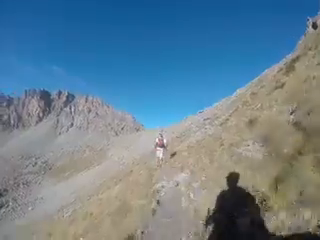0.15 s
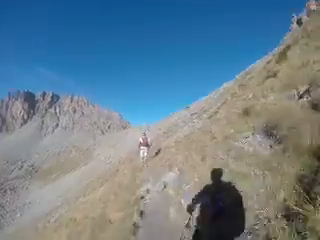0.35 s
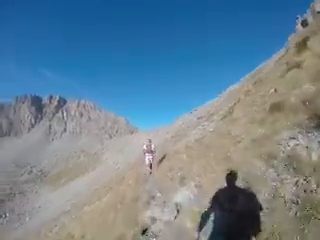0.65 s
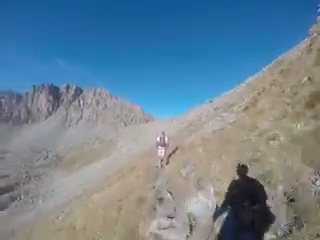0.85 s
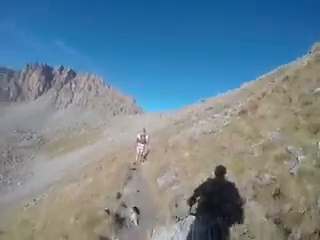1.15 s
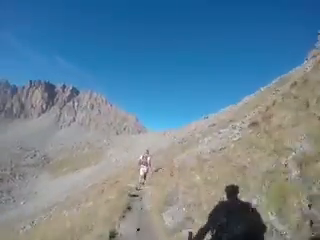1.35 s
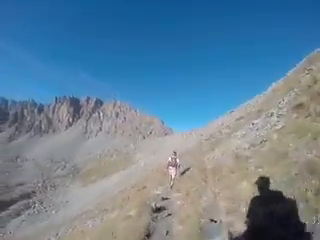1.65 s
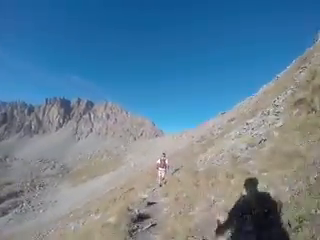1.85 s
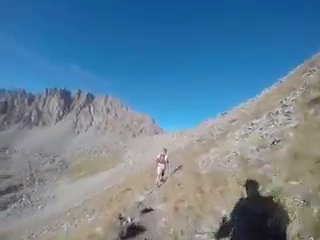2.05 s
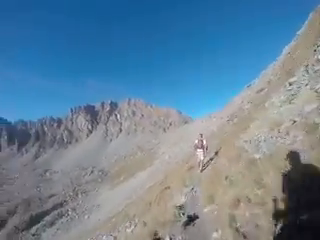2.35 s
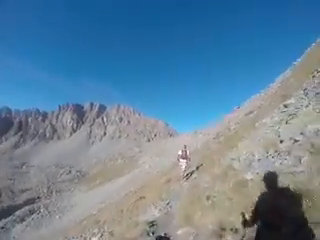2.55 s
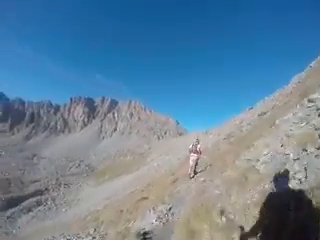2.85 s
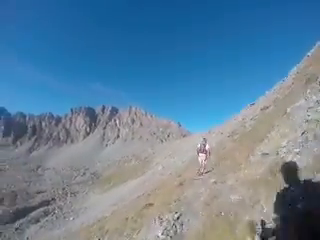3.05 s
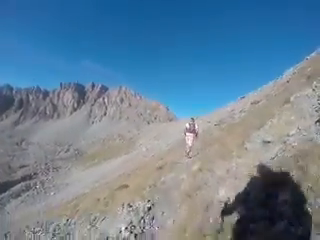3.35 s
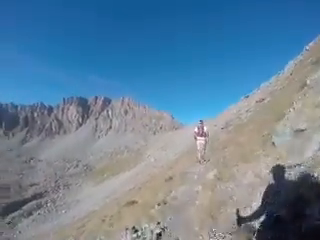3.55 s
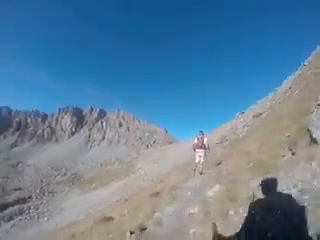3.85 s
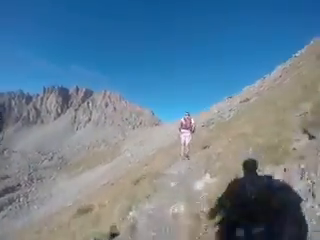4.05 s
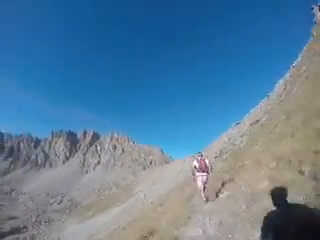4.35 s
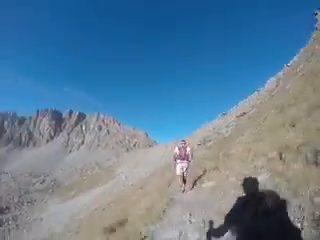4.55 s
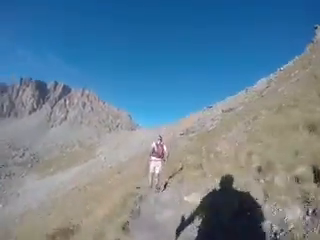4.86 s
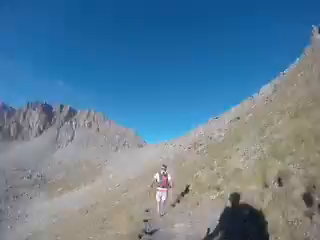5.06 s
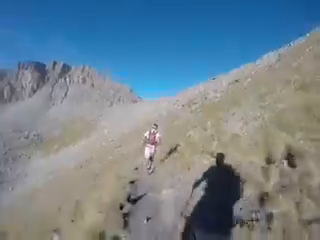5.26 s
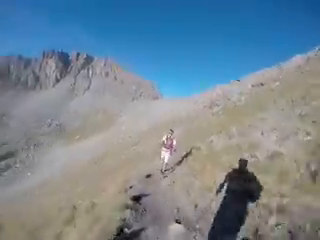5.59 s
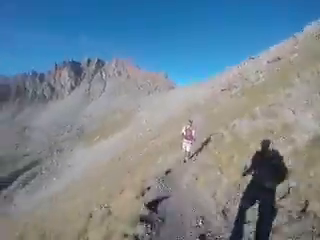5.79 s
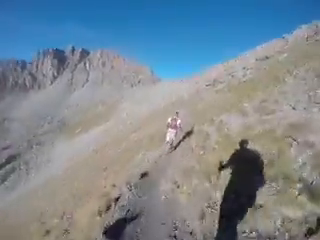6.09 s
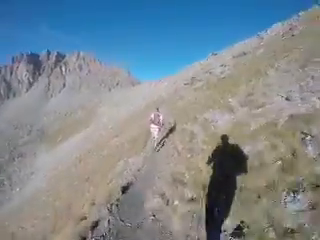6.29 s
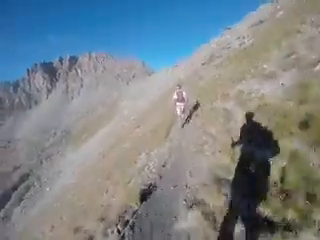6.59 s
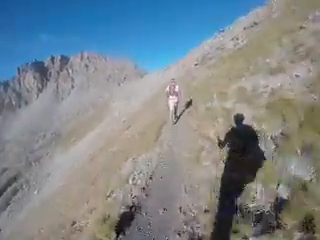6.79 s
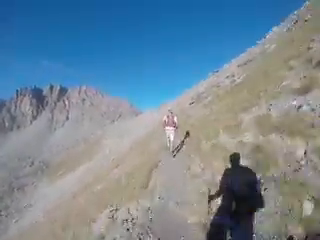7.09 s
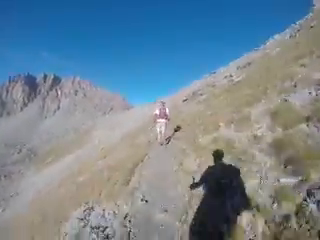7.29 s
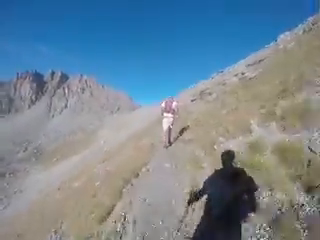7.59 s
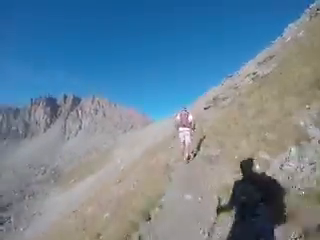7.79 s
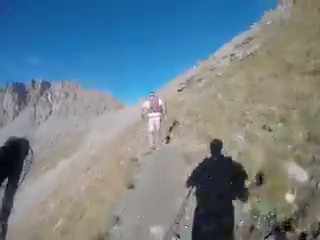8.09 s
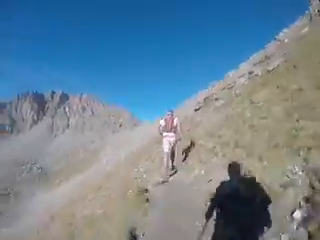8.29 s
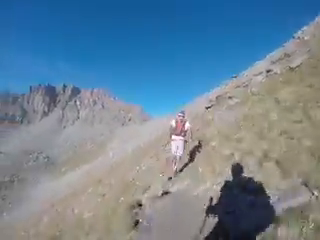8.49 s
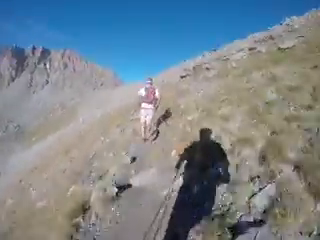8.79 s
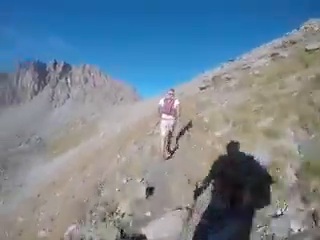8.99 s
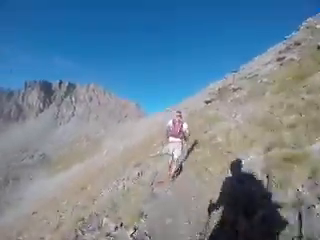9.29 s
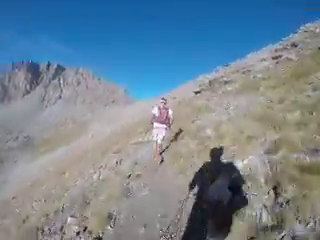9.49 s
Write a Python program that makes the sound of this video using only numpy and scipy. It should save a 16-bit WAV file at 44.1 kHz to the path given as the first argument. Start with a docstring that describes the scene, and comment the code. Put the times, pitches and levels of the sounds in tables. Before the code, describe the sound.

Brisk footsteps crunch on a gravel path with pole clicks, low wind buffets and one sharp knock on the microphone's case.

```python
"""A gravel path on an open slope, heard close from a small cased camera worn on a hiker's body.
Each footfall grinds pebbles and rock chips together and pushes air over the microphone; soles
scuff, pole tips and kicked stones click. Right at the microphone, cloth rustles and the harness
tugs and squeaks. Something knocks the case three times; the hardest blow overloads the input,
and the camera's gain ducks and creeps back."""
import sys
import numpy as np
from scipy import signal
from scipy.fft import rfft, irfft, next_fast_len
from scipy.io import wavfile
from scipy.ndimage import uniform_filter1d, minimum_filter1d, map_coordinates

SR = 44100
rng = np.random.default_rng(int(sys.argv[2]) if len(sys.argv) > 2 else 0)


def generate_wav(signal):
    """Clip the signal to [-1, 1] and save it as 16-bit WAV at the path in sys.argv[1]."""
    frames = np.transpose(np.atleast_2d(signal))
    scaled = np.clip(frames, -1, 1) * 32767
    pcm = np.round(scaled).astype(np.int16)
    wavfile.write(sys.argv[1], SR, pcm)


N = 425124

# Footfalls, close to three a second. Each row: time in seconds, crunch level in dB,
# seconds to fade by 10 dB, level of the air push on the microphone in dB.
FOOTFALLS = [(0.05, -57, .04, -47), (0.38, -55.5, .1, -48), (0.73, -52.5, .1, -49),
             (1.093, -53.5, .04, -46.5), (1.45, -58.5, .12, -46.5), (1.85, -56, .07, -44),
             (2.21, -54.5, .17, -43.5), (2.58, -57.5, .2, -46), (3.0, -54.5, .1, -48),
             (3.325, -54, .08, -42), (3.675, -55, .08, -48), (4.01, -51.5, .11, -42), (4.31, -52, .17, -45),
             (4.66, -54, .11, -47), (5.02, -55.5, .17, -50), (5.37, -55, .09, -44), (5.745, -56, .14, -49),
             (6.13, -53.5, .11, -45), (6.535, -51, .16, -45), (6.835, -51.5, .1, -44),
             (7.12, -54, .14, -44), (7.41, -53, .12, -41), (7.735, -52, .12, -46), (8.04, -51.5, .2, -38.5),
             (8.4, -51.5, .11, -42.5), (8.73, -54.5, .08, -44), (9.122, -54.5, .08, -49),
             (9.51, -56, .1, -48)]


def amp(db):
    """Decibels to gain."""
    return 10 ** (np.asarray(db) / 20)


def unit(x):
    """Scaled to rms 1."""
    return x / np.sqrt(np.mean(x ** 2) + 1e-20)


def wobble(rate):
    """A smooth random curve, rate knots a second."""
    knots = rng.standard_normal(int(N * rate / SR) + 4)
    return map_coordinates(knots, [np.arange(N) * rate / SR])


def filtered(x, response):
    """x through a complex response of frequency."""
    m = next_fast_len(len(x) + 8192)
    return irfft(rfft(x, m) * response(np.fft.rfftfreq(m, 1 / SR)), m)[:len(x)]


def colour(points):
    """Causal response with the gains of (Hz, dB) points."""
    def response(hz):
        f, db = np.transpose(points)
        gain = amp(np.interp(np.log(hz + 1), np.log(f), db))
        cepstrum = irfft(np.log(gain))
        half = len(cepstrum) // 2
        return np.exp(rfft(np.r_[cepstrum[0], 2 * cepstrum[1:half]], len(cepstrum)))
    return response


def resonance(hz, centre, width):
    """One damped mode, gain 1 at its centre."""
    return 1j * hz * width / (centre ** 2 - hz ** 2 + 1j * hz * width)


def noise(points):
    """Coloured noise of rms 1."""
    return unit(filtered(rng.standard_normal(N), colour(points)))


def add(track, s, sound):
    """Mix a sound into the track from s seconds on."""
    part = track[max(round(s * SR), 0):][:len(sound)]
    part += sound[:len(part)]


def swell(s, rise_s, fade_s, hold_s=.018):
    """Gain of one footfall or scuff: up 10 dB per rise_s, full at s, held, down 10 dB per fade_s."""
    t = np.arange(N) / SR - s
    return amp(-10 * (np.maximum(-t, 0) / rise_s + np.maximum(t - hold_s, 0) / fade_s))


def hiss_and_whine(hiss_db=-57.0, flutter_db=1.2):
    """Steady hiss of open air and microphone, with the camera's faint, fluttering electronic whine."""
    # Colour of the hiss. Each row: frequency in Hz, relative level in dB.
    hiss_colour = [(25, 15.5), (100, 5.5), (250, -1), (600, -2), (1200, -6), (1600, -8), (2100, -10),
                   (2600, -3.5), (3000, -14), (3400, -10), (4000, -13), (5600, -14.5), (7500, -20.5),
                   (11000, -23.5), (15000, -31.5)]
    # Tones of the whine. Each row: frequency in Hz, level in dB.
    tones = [(7101, -90.5), (9469, -82), (11838, -83), (14207, -89.5)]
    t = np.arange(N) / SR
    whine = sum(np.sqrt(2) * amp(db - 0.5 + flutter_db * wobble(25)) * np.sin(2 * np.pi * hz * t)
                for hz, db in tones)
    return amp(hiss_db) * noise(hiss_colour) + whine


def airflow(breeze_db=-58, lead_s=.014, rise_s=.09, fade_s=.1):
    """Strength of the air at the microphone: a light breeze, and a lurch just ahead of each crunch."""
    lurches = sum((amp(db) * swell(s - lead_s, rise_s, fade_s)) ** 2 for s, _, _, db in FOOTFALLS)
    return np.sqrt(lurches + amp(breeze_db) ** 2)


def wind_and_clothes(buffet_db=-1.3, rustle_db=-66.8, flutter_db=5.0):
    """Moving air buffets the microphone in low lumps; cloth rubs harder when the body sways more."""
    # Colours of the buffeting and of the cloth. Each row: frequency in Hz, relative level in dB.
    buffet_colour = [(10, -3.5), (22, 4), (45, -4.5), (80, -10.5), (130, -21.5), (300, -40.5), (900, -77.5)]
    cloth_colour = [(40, -19.5), (90, -2), (150, 0.5), (280, -5), (600, -12.5), (1000, -18), (2500, -41),
                    (8000, -43.5)]
    sway = airflow()
    rubbing = np.sqrt(sway) * noise(cloth_colour) * amp(flutter_db * wobble(70))
    return amp(buffet_db) * sway * noise(buffet_colour) + amp(rustle_db) * unit(rubbing)


def harness_tugs(gain_db=4, small_per_s=24, small_db=-55.5, scatter_db=1.8, growth_db_per_s=.4):
    """Each slip of the harness gives the case a dull tug; the many small ones grow along the walk."""
    # The harness slips and catches hard. Each row: start in seconds, level in dB.
    hard_slips = [(1.64, -46), (1.66, -44), (2.233, -45.5), (2.355, -48), (2.602, -46), (2.84, -39.5),
                  (4.023, -46.5), (4.389, -45.5), (4.471, -46.5), (4.866, -46), (5.97, -48), (4.927, -39.5),
                  (5.127, -44.5), (5.697, -44), (6.476, -43), (6.694, -44), (7.878, -45), (7.897, -44),
                  (8.242, -44.5), (8.95, -47), (8.086, -41), (8.465, -43.5), (8.601, -41.5), (8.844, -44.5),
                  (9.221, -42.5), (9.248, -41.5), (9.281, -43), (9.324, -41)]
    # Colour of one tug. Each row: frequency in Hz, relative level in dB.
    tug_colour = [(20, -14.5), (60, 0), (130, 1.5), (280, -7), (500, -13), (800, -31), (2500, -49),
                  (9000, -75)]
    when, size = rng.random((int(small_per_s * N / SR), 2)).T
    times = when * N / SR
    levels_db = small_db + growth_db_per_s * times + scatter_db * np.minimum(-np.log(1 - size), 2)
    tug = filtered(signal.unit_impulse(SR // 20), colour(tug_colour))
    out = np.zeros(N)
    for s, db in np.vstack([hard_slips, np.c_[times, levels_db]]):
        add(out, s, amp(db + gain_db) * rng.choice([-1, 1]) * tug / np.abs(tug).max())
    return out


def strap_squeaks(gain_db=0.3, bend=.19, crest=.1):
    """Webbing slips under load: the squeak rises and falls with the speed of the slip."""
    # Each row: midpoint in seconds, length in seconds, top pitch in Hz, level in dB, roughness 0-1.
    squeaks = [(0.548, 0.125, 2700, -56, 0.4), (1.43, 0.07, 3230, -54, 0.15),
               (2.008, 0.065, 3300, -57, 0.15), (2.575, 0.092, 3300, -58, 0.08),
               (9.45, 0.075, 3280, -55.5, 0.05)]
    out = np.zeros(N)
    for s, length, top_hz, db, rough in squeaks:
        u = np.linspace(-1, 1, int(length * SR))  # progress through the slip
        jitter = 1 + rough * wobble(700)[:len(u)] / 10
        hz = top_hz * (1 - bend * (u - crest) ** 2) * jitter
        phase = 2 * np.pi * np.cumsum(hz) / SR
        grip = amp(db + gain_db + 2 * wobble(145)[:len(u)]) * np.cos(np.pi * u / 2)
        add(out, s - length / 2, grip * (np.sin(phase) + .8 * rough * np.sin(2 * phase)))
    return out


def case_knocks(gain_db=41, push_hz=100, push_width_hz=85, mount_hz=1860, rattle_t60=.035):
    """A blow pushes the air in the case, rings shell and mount, and rattles; soft blows lose treble."""
    # Blows on the case. Each row: time in seconds, force in dB, treble corner in Hz,
    # then the relative levels of bass push, rattle and mount ring in dB.
    blows = [(2.9832, -28, 1650, 5.5, -28, -46), (3.195, 8.3, 12200, -17.5, -66, -40),
             (3.2714, -7.5, 3400, 2.5, -29, -13.5)]
    # Modes of the plastic shell. Each row: frequency in Hz, width in Hz, level in dB.
    shell_modes = [(300, 380, -12.7), (600, 190, -13), (835, 280, -15), (1554, 230, -7), (1890, 150, -15),
                   (2295, 200, -2), (2820, 52, -28.5), (3110, 310, -14.5), (3560, 160, -23),
                   (4490, 350, -11.3), (5070, 230, -15), (5917, 410, -11.3), (7200, 380, -20.5),
                   (9320, 900, -33), (11800, 1400, -44)]
    out, t = np.zeros(N), np.arange(SR // 6) / SR
    lead = SR // 1000  # the contact force takes a moment to build
    for s, db, soft_hz, push_db, rattle_db, ring_db in blows:
        def softness(hz):
            return np.exp(-(hz / soft_hz) ** 2)

        def shell_and_mount(hz):
            shell = sum(amp(level) * resonance(hz, centre, width) for centre, width, level in shell_modes)
            return (shell + amp(ring_db) * resonance(hz, mount_hz, width=22)) * softness(hz)
        blow = np.pad(signal.unit_impulse(len(t)), (lead, 0))
        rattle = np.pad(amp(rattle_db - 60 * t / rattle_t60) * rng.standard_normal(len(t)), (lead, 0))
        push = filtered(blow, lambda hz: resonance(hz, push_hz, push_width_hz) * softness(hz))
        ring = filtered(blow + rattle, shell_and_mount)
        add(out, s - lead / SR, amp(db + gain_db) * (ring + amp(push_db) * push))
    return out


def stone_clicks(width_hz=820, chatter_db=-11, body_hz=800, body_db=-14, usual_db=-37, gain_db=-.5):
    """A hard tip meets stone and chatters briefly; harder strikes bring out the stone's dull body."""
    # Pole tips and kicked stones. Each row: time in seconds, level in dB, pitch in Hz,
    # seconds for the chatter to fade by 60 dB.
    strikes = [(0.3206, -37.5, 1660, .018), (0.6155, -37.5, 2050, .055), (0.7324, -32, 2750, .024),
               (1.2385, -40, 2660, .014), (1.3814, -42, 1900, .034), (1.7707, -43, 2310, .023),
               (1.9137, -42.5, 2680, .023), (2.31, -42.5, 2530, .025), (1.8592, -39.5, 2330, .03),
               (1.8855, -39, 2370, .034), (2.5104, -40, 2440, .018), (2.5355, -41, 1630, .03),
               (3.052, -43, 2820, .03), (8.047, -38, 3520, .03), (8.6537, -41, 2870, .024),
               (3.9979, -37, 2290, .062), (4.2486, -34.5, 2400, .06), (4.2862, -35.5, 2540, .03),
               (4.6412, -35, 1760, .038), (4.6808, -36.5, 2100, .038), (4.8932, -40, 1600, .05),
               (5.2758, -38, 1660, .037), (5.3292, -37.5, 1690, .024), (5.382, -35.5, 1900, .073),
               (5.6684, -35.5, 1450, .045), (6.475, -34.5, 1900, .021), (6.772, -27.5, 1500, .045),
               (6.8308, -39, 1650, .053), (7.3425, -23.5, 1550, .027), (7.648, -40, 1610, .027),
               (8.296, -41, 1400, .03), (8.3774, -37, 2520, .028), (8.9997, -39, 1420, .04),
               (9.5107, -35, 1820, .016), (9.534, -39, 2500, .017), (9.5462, -35.5, 2820, .033)]
    # A struck stone heard through the case. Each row: frequency in Hz, relative level in dB.
    stone_colour = [(200, -9.5), (700, -9), (1100, -8.5), (1500, 1), (2000, -.5), (2700, 1.5), (3400, -5),
                    (4000, -11.5), (5600, -4.5), (7500, -26), (15000, -22)]
    out, t = np.zeros(N), np.arange(SR // 10) / SR
    for s, db, centre_hz, t60 in strikes:
        contact = amp(chatter_db - 60 * t / t60) * rng.standard_normal(len(t))
        contact[0] += 1  # the first impact
        body = amp(body_db + .6 * (db - usual_db))

        def stone(hz):
            ring = resonance(hz, centre_hz, width_hz) - body * resonance(hz, body_hz, width=900)
            return ring * colour(stone_colour)(hz)
        tick = filtered(contact, stone)
        add(out, s + 0.00096, amp(db + gain_db) * tick / np.abs(tick).max())
    return out


def grinding(heel_rise_s=.04, drag_rise_s=.025, trickle_db=-69.5):
    """How hard the gravel is worked: footfalls, scuffs and the trickle between them add in power."""
    # A sole or pole drags. Each row: time in seconds, level in dB, seconds to fade by 10 dB.
    drags = [(0.55, -61, .1), (0.99, -63, .02), (1.65, -64, .06), (1.775, -58, .05), (3.93, -59, .08),
             (4.18, -59, .06), (4.45, -58.5, .08), (4.585, -52, .025), (4.885, -56, .02),
             (5.135, -58.5, .14), (5.51, -58.5, .09), (6.94, -59, .08), (7.27, -58, .1), (7.51, -55.5, .08),
             (7.64, -51.5, .06), (7.95, -53, .1), (8.13, -54.5, .06), (8.23, -56, .07), (8.82, -57.5, .05),
             (9.37, -56, .07)]
    steps = sum((amp(db) * swell(s, heel_rise_s, fade_s)) ** 2 for s, db, fade_s, _ in FOOTFALLS)
    scuffs = sum((amp(db) * swell(s, drag_rise_s, fade_s)) ** 2 for s, db, fade_s in drags)
    return np.sqrt(steps + scuffs + amp(trickle_db) ** 2)


def rock_chips(effort, per_s=130, low_hz=5300, high_hz=10500, spread_db=3.2, gain_db=-15.5):
    """Small chips of rock tick dryly under the sole, higher than most of the pebbles."""
    when, size, pitch = rng.random((int(per_s * N / SR), 3)).T
    strengths = np.minimum(-np.log(1 - size), 3)
    out, t = np.zeros(N), np.arange(SR // 150) / SR
    for s, strength, high in zip(when * N / SR, strengths, pitch):
        hz = low_hz * (high_hz / low_hz) ** (high ** 3)
        tick = np.sin(2 * np.pi * hz * t) * np.exp(-hz * t / 2.5) * (1 - np.exp(-hz * t))
        add(out, s, amp(spread_db * strength - 11 * high) * tick)  # smaller chips: higher and weaker
    return amp(gain_db) * effort * unit(out)


def gravel_crunch(effort, per_s=950, low_hz=1200, high_hz=9000, spread_db=2.8, sand_db=1, clump_db=1.4):
    """Pebbles snap against each other in clumps, each at its own pitch, over a hiss of sand."""
    # Gravel underfoot, heard through the case. Each row: frequency in Hz, relative level in dB.
    gravel_colour = [(500, -23), (1000, -12), (1300, -13), (1650, -1), (1950, -5), (2500, 2), (2950, -4),
                     (3400, -2), (3950, -14), (5100, -9.5), (6000, -7.5), (7200, -24.5), (11000, -25.5),
                     (15000, -37.5)]
    when, size, pitch = rng.random((int(per_s * N / SR), 3)).T
    t = np.arange(SR // 150) / SR
    hz = low_hz * (high_hz / low_hz) ** (pitch[:, None] ** 1.3)
    strength = amp(spread_db * np.minimum(-np.log(1 - size), 4))  # few large pebbles, many small
    snaps = strength[:, None] * np.sin(2 * np.pi * hz * t) * np.exp(-hz * t / 3.6) * np.sqrt(hz)
    index = (when * N).astype(int)[:, None] + np.arange(len(t))
    pebbles = unit(np.bincount(index.ravel(), snaps.ravel(), N)[:N])
    sand = amp(sand_db) * rng.standard_normal(N)
    grit = (pebbles + sand) * amp(clump_db * wobble(110))
    return effort * unit(filtered(grit, colour(gravel_colour)))


def scene():
    """Everything reaches the one body-worn microphone directly; the open slope gives no echo."""
    effort = grinding()
    ground = gravel_crunch(effort) + rock_chips(effort) + stone_clicks()
    gear = case_knocks() + strap_squeaks() + harness_tugs()
    return (ground + gear + wind_and_clothes() + hiss_and_whine())[None]


def record(dry, overload_db=15, ceiling_db=0, hold_s=0.215, recover_db_per_s=25, top_hz=15100):
    """The camera's input overloads on a hard blow; its gain ducks at once, holds, recovers steadily."""
    saturated = amp(overload_db) * np.tanh(dry[0] / amp(overload_db))
    needed_db = np.minimum(ceiling_db - 20 * np.log10(np.abs(saturated) + 1e-9), 0)
    half_hold, attack = int(hold_s * SR / 2), SR // 500
    held_db = minimum_filter1d(needed_db, size=2 * half_hold + 1, origin=half_hold - attack)
    climb_db = recover_db_per_s * np.arange(N) / SR
    gain_db = np.minimum.accumulate(held_db - climb_db) + climb_db
    ducked = saturated * amp(uniform_filter1d(gain_db, size=attack))
    return filtered(ducked, lambda hz: 1 / np.sqrt(1 + (hz / top_hz) ** 120))[None]  # steep treble cut


dry = scene()
out = record(dry)
generate_wav(out)
```